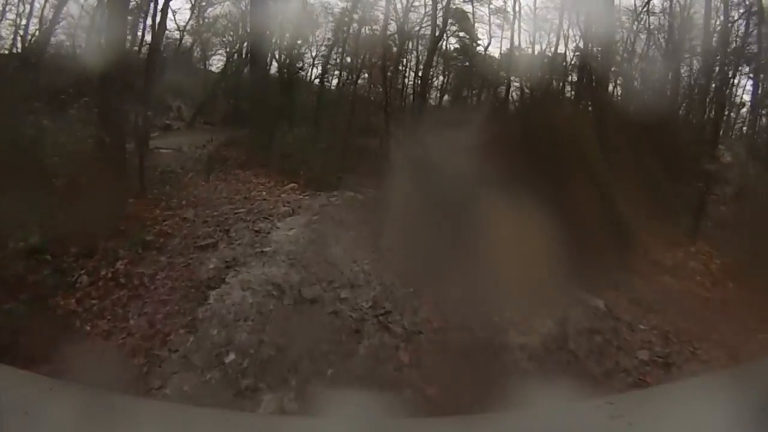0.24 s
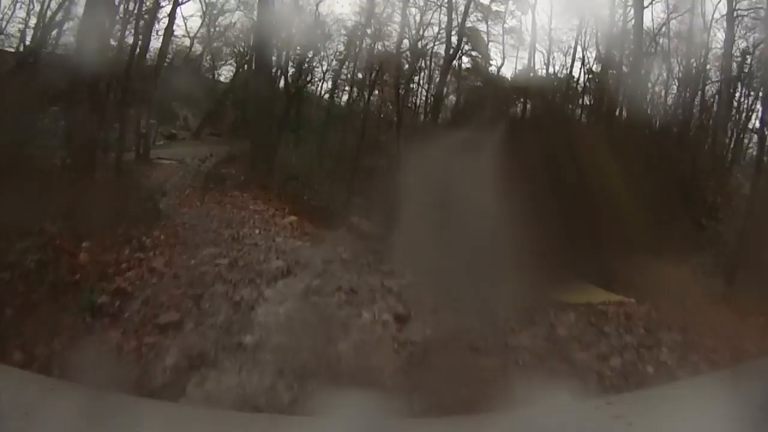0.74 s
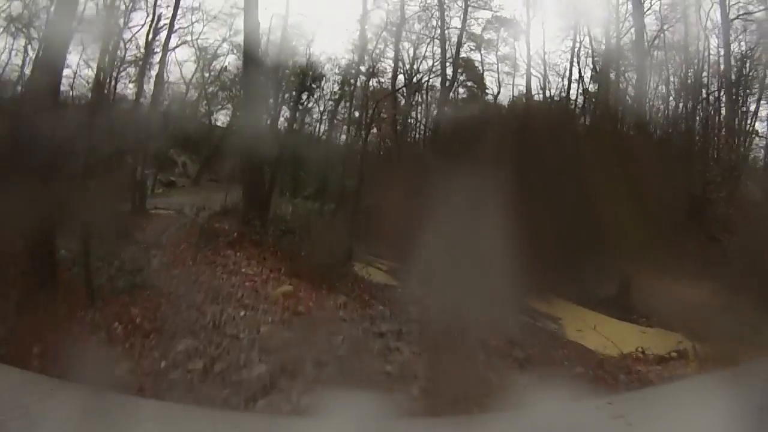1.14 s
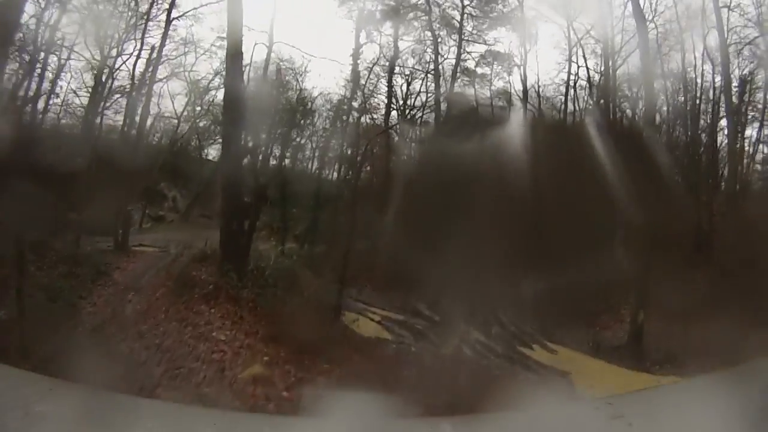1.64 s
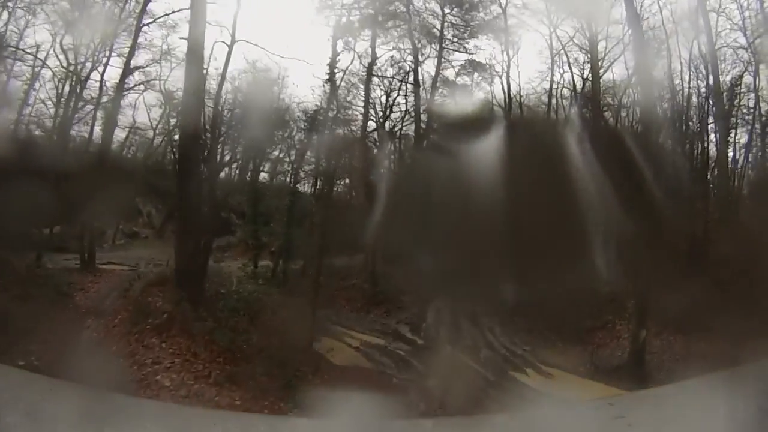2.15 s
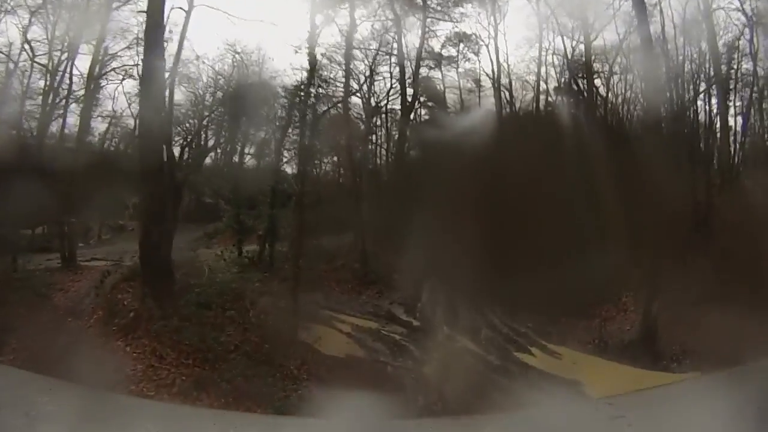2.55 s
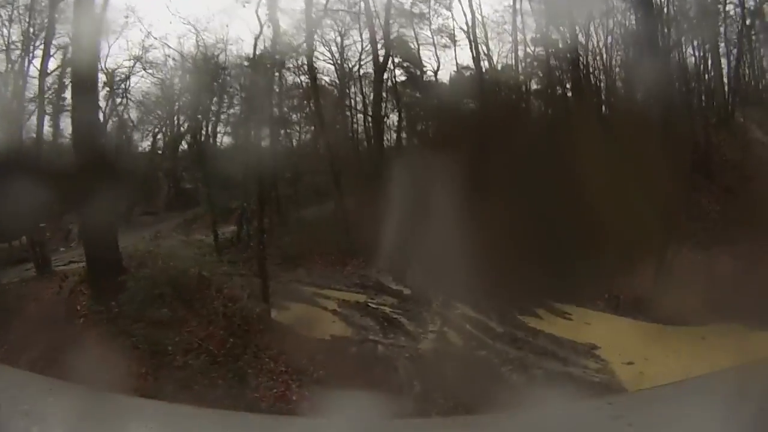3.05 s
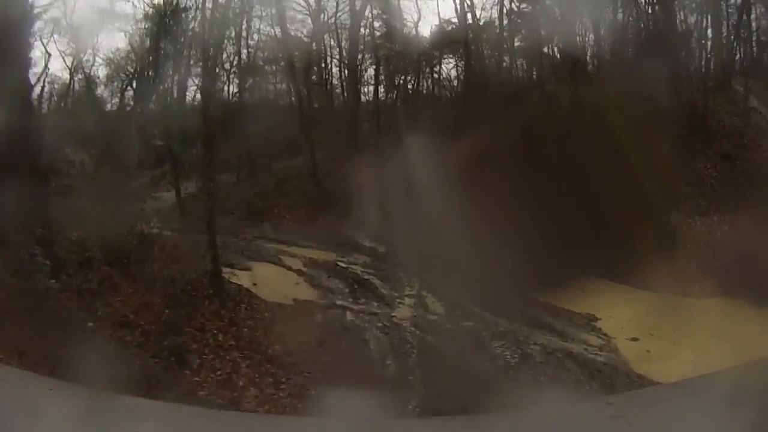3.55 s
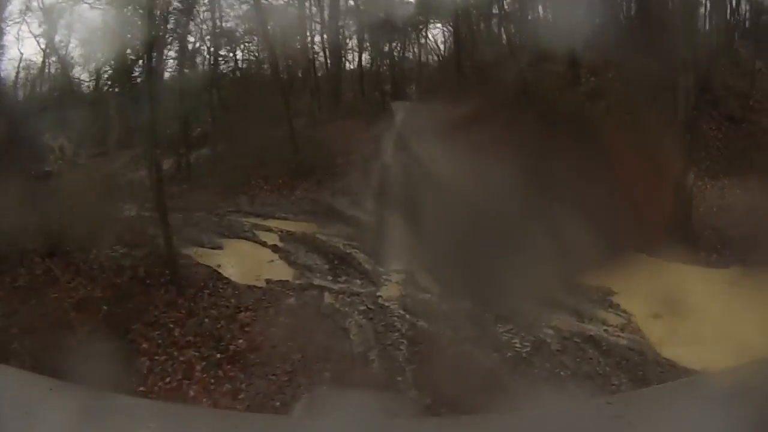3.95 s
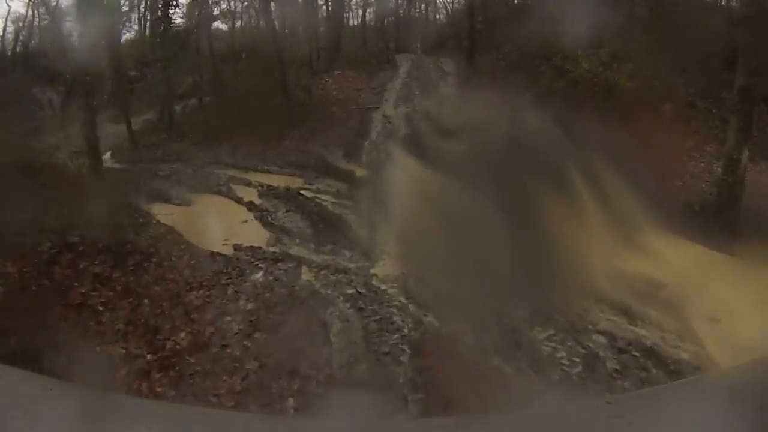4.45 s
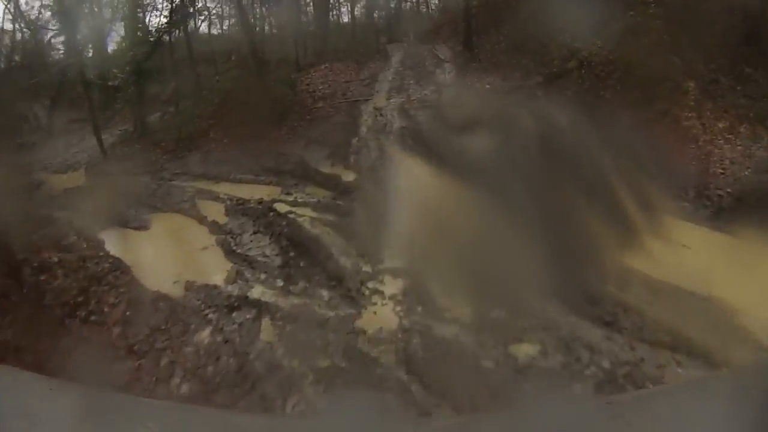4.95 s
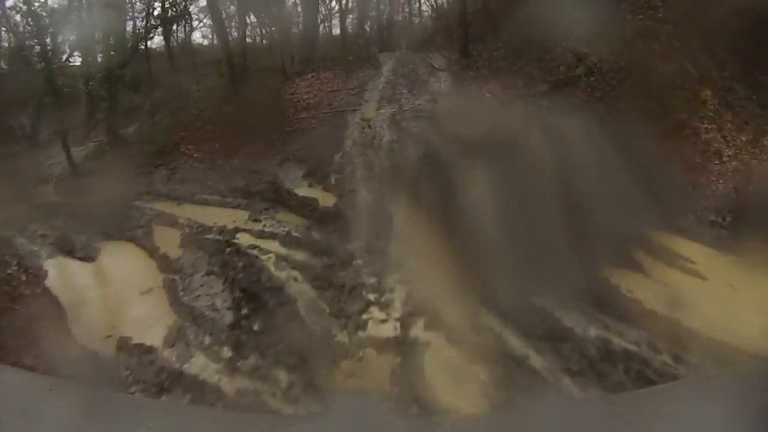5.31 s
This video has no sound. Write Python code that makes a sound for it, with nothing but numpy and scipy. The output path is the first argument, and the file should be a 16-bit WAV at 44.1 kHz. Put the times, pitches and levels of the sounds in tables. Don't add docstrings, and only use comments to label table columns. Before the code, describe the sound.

Heard inside the cabin of a diesel 4x4 in a rainy wood, mono and close. The engine begins as a low, subdued throb, picks up by 0.6 s and booms deeply from about 0.9 to 2.4 s, with a wavering growl above. It then drops to a slow, quiet chug until around 4 s, when deep shaking and soft suspension thumps come through, thickest from 3.2 to 4.2 s. From 4.4 s the revs climb steadily and the boom returns, still rising at the cut at about 5.6 s. Steady rain patters densely on the roof, thinning slightly after 3 s. Irregular drips tap and ring the panels, with strong knocks near 1.0, 1.35, 2.6, 2.9, 3.4 and 4.8 s. Dry, bright snaps hit the glass, notably at 1.35 and loudest at 2.4 s. A faint turbo hiss and floor drone lie beneath.

```python
import sys
import numpy as np
from scipy import signal
from scipy.fft import rfft, irfft, next_fast_len
from scipy.io import wavfile

SR = 44100
rng = np.random.default_rng(int(sys.argv[2]) if len(sys.argv) > 2 else 0)


def output_pcm(signal):
    pcm = np.clip(np.atleast_2d(signal).T, -1, 1) * 32767
    wavfile.write(sys.argv[1], SR, np.round(pcm).astype(np.int16))


def convert_level_to_amplitude(level_db):
    exponent = np.asarray(level_db, float) / 20
    return 10 ** exponent


N = 246071


def evened(x):
    return x / np.sqrt(np.mean(x ** 2) + 1e-20)


def resonances(modes, hz):
    power = sum(convert_level_to_amplitude(db) ** 2 / (1 + (2 * (hz - f) / width) ** 2) ** 2 for f, width, db in modes)
    return np.sqrt(power)


def noise(gain, size, lo_hz=0, hi_hz=SR):
    full = next_fast_len(size, True)
    hz = np.fft.rfftfreq(full, 1 / SR)
    spectrum = rfft(rng.standard_normal(full)) * gain(hz)
    inside = (hz >= lo_hz) * (hz < hi_hz)
    return evened(irfft(spectrum * inside, full)[:size])


def steady_noise(gain, lo_hz=0):
    return noise(gain, N + 1, lo_hz)[:N]


def drift(rate_hz):
    return steady_noise(lambda hz: 1 / (1 + (hz / rate_hz) ** 4))


def blow(rise, t60, size):
    t = np.arange(size) / SR
    attack = 1 - np.exp(-t / max(rise, 1e-5))
    shape = attack * convert_level_to_amplitude(-60 * t / max(t60, .003))
    return shape / shape.max()


def add(mix, s, sound):
    part = mix[round(s * SR):][:len(sound)]
    part += sound[:len(part)]


# time in seconds, firing rate in Hz, boom level in dB.
ENGINE_RUN = [(0.0, 31.0, -35), (0.31, 32.2, -31), (0.6, 33.3, -21), (0.78, 34.9, -28), (0.93, 36.3, -16.5),
              (1.47, 37.3, -18.5), (1.68, 37.4, -15), (2.1, 36.3, -15), (2.36, 34.4, -18), (2.5, 32.0, -33),
              (2.75, 29.0, -37), (3.62, 28.0, -34), (4.04, 29.8, -31), (4.44, 34.8, -28), (4.64, 37.3, -20),
              (4.89, 40.3, -16.5), (4.99, 41.5, -27), (5.58, 46.9, -21)]
ORDER_MULTIPLES = [2, 3, 5, 1.5, 2.5, 4, 6, 7]
ORDER_LEVELS = [-35.5, -46.5, -47, -42.5, -48, -51.5, -58, -55.5]
# frequency in Hz, width in Hz, lift in dB.
BODY_LIFT = [
    (86, 10, 10),
    (132, 30, 6),
]
# frequency in Hz, level in dB per Hz.
SHAKE_COLOUR = [(15, -23), (30, -2.5), (38, 8.5), (46, -2.5), (60, -5.5), (90, -15), (105, -17), (150, -17),
                (180, -13.5), (203, -12), (235, -17.5), (300, -23.5), (420, -25), (600, -57)]
# time in seconds, level in dB.
RUT_RUMBLE = [
    (0, -54),
    (.5, -30),
    (1, -45),
    (2.3, -41.5),
    (2.7, -36.5),
    (3.6, -27),
    (4.3, -34.5),
    (4.85, -36),
    (5.2, -28.5),
]
# peak time in seconds, pitch in Hz, level in dB, length in seconds.
SUSPENSION_JOLTS = [(0.706, 135, -34.5, 0.036), (1.964, 51.6, -25, 0.11), (2.31, 143, -31.5, .1),
                    (2.895, 37.3, -30, 0.46), (3.046, 39.7, -40, 0.18), (3.259, 45, -23, 0.045),
                    (3.344, 46.7, -22, 0.049), (3.525, 37.3, -25.5, 0.34), (3.718, 38, -23, 0.096),
                    (3.852, 44, -20.5, 0.14), (4.009, 41.5, -24, 0.25), (4.19, 40, -27, 0.23),
                    (5.27, 128, -37, 0.11), (5.383, 38.8, -30, 0.57)]


def engine():
    t = np.arange(N) / SR
    s, *columns = np.transpose(ENGINE_RUN)
    firing_hz, boom_db = (np.interp(t, s, column) for column in columns)
    turns = np.cumsum(firing_hz * (1 + .003 * drift(rate_hz=6))) / SR
    boom_db = boom_db - 4.6 * np.maximum(31.5 - firing_hz, 0)

    third_hz = 3 * firing_hz
    lifted_db = sum(lift_db / (1 + (2 * (third_hz - f) / width) ** 2) for f, width, lift_db in BODY_LIFT)
    orders = [(1, boom_db, .4)]  # multiple, level in dB, waver in dB
    for multiple, db in zip(ORDER_MULTIPLES, ORDER_LEVELS):
        orders.append((multiple, db + (multiple == 3) * lifted_db, 2.8))
    tones = np.zeros(N)
    for multiple, db, waver_db in orders:
        tone = np.sqrt(2) * np.cos(2 * np.pi * (multiple * turns + rng.random()))
        tones += convert_level_to_amplitude(db + waver_db * drift(rate_hz=7.4)) * tone

    f, db = np.transpose(SHAKE_COLOUR)
    shake = steady_noise(lambda x: convert_level_to_amplitude(np.interp(np.log(x + 1), np.log(f), db, left=-60, right=-90)))
    low_pass = signal.butter(2, 110, fs=SR, output="sos")
    rumble = signal.sosfiltfilt(low_pass, shake)
    rumble_db = np.interp(t, *np.transpose(RUT_RUMBLE)) + 3.2 * drift(rate_hz=5.9)
    rattle_db = -32.5 + 1.2 * drift(rate_hz=7.3)
    body = convert_level_to_amplitude(rumble_db) * rumble + convert_level_to_amplitude(rattle_db) * (shake - rumble)

    jolts = np.zeros(N)
    for s, hz, db, length in SUSPENSION_JOLTS:
        swell = np.exp(-(2 * (t - s) / length) ** 2)
        jolts += convert_level_to_amplitude(db) * swell * np.sin(2 * np.pi * hz * (t - s))
    return tones + jolts + body, turns


def turbo():
    s, hz = np.transpose(ENGINE_RUN)[:2]
    speed = np.interp(np.arange(N) / SR, s, hz) / 36
    hiss = steady_noise(lambda f: resonances([(3900, 3500, -1.5), (5600, 1600, -4.5)], f))
    drone = steady_noise(lambda f: resonances([(203, 14, 0), (522, 14, -6), (1100, 14, -13)], f))
    return convert_level_to_amplitude(-64.5) * speed ** 3.6 * hiss + convert_level_to_amplitude(-44) * drone


# frequency in Hz, width in Hz, level in dB.
CABIN_MODES = [(182, 137, 8), (529, 79, 5.5), (577, 29, 5.5), (626, 200, 5), (675, 13, -7), (800, 310, 0),
               (1040, 350, -4.5), (1106, 36, -3), (1560, 247, 3), (1720, 80, 5.5), (2220, 410, 2.5),
               (2800, 400, -5.5), (3090, 175, -7), (3420, 120, -36), (4250, 280, -17), (4670, 550, -15.5),
               (5500, 500, -17.5), (6730, 1600, -54), (11600, 14000, -37)]
# low edge in Hz, high edge in Hz, rise in seconds, factor on the ring time.
PANEL_BANDS = [
    (120, 350, 0.029, 1.42),
    (322, 1400, 0.00091, 1.77),
    (1180, 4200, 0.00077, 1.15),
    (3670, 5600, 0.00022, 0.55),
    (7000, 9000, .0003, 0.13),
]


def knock(levels_db, t60, size=8192, modes=CABIN_MODES):
    colour = resonances(modes, np.fft.rfftfreq(next_fast_len(size, True), 1 / SR))
    sound = np.zeros(size)
    for db, (lo_hz, hi_hz, rise, ring) in zip(levels_db, PANEL_BANDS):
        band = noise(lambda hz: colour, size, lo_hz, hi_hz)
        sound += convert_level_to_amplitude(db) * blow(rise, t60 * ring, size) * band
    return sound


# time in seconds, level in dB.
RAIN_LEVEL = [
    (0.0, -37),
    (0.8, -38),
    (2.051, -36.5),
    (3.26, -40.5),
    (3.64, -38.5),
    (4.26, -41),
    (4.94, -38),
    (5.58, -38),
]


def patter(turns):
    drops_per_s, patches = 320, 24
    strength = convert_level_to_amplitude(4.26 * np.minimum(rng.exponential(1, N), 3))
    strength = strength * (rng.random(N) < drops_per_s / SR)
    patch = rng.integers(0, patches, N)
    drops = np.zeros(N)
    for k in range(patches):
        tap = knock([-7.5, -2.5, -1.5, -15.5, -31], 0.054, size=4096)
        drops += signal.oaconvolve(strength * (patch == k), tap)[:N]

    wash = steady_noise(lambda hz: resonances(CABIN_MODES[1:], hz))
    firing_pulse = 1 + .5 * np.exp(-(turns % 1) / 0.24)
    wash *= firing_pulse * convert_level_to_amplitude(1.7 * drift(rate_hz=36))
    s, db = np.transpose(RAIN_LEVEL)
    level = convert_level_to_amplitude(np.interp(np.arange(N) / SR, s, db))
    return level * evened(evened(drops) + 0.65 * evened(wash))


# time in seconds, middle level in dB, low-middle level in dB, middle mode of the panel in Hz.
HEAVY_DRIPS = [(0.632, -20, -24, 2100), (0.6764, -30, -39, 1600), (0.972, -14.5, -26, 1720),
               (1.1855, -29.5, -36.5, 2330), (1.2424, -26, -36, 1740), (1.353, -13.5, -19.5, 2380),
               (1.425, -28.5, -38, 2200), (2.4104, -24, -37.5, 2170), (2.577, -19, -26.5, 2390),
               (2.5894, -26, -29.5, 1750), (2.9287, -30, -38, 2410), (2.9354, -14.5, -24, 2165),
               (3.2063, -30, -41, 1710), (3.3975, -17.5, -23, 2270), (3.4143, -15, -21.5, 2220),
               (3.6694, -22, -28.5, 1680), (3.6854, -30, -49, 2170), (3.9836, -28, -40, 2300),
               (4.2448, -23.5, -24, 2220), (4.4026, -31, -51, 2300), (4.4215, -34, -39, 2350),
               (4.8184, -32, -36, 1550), (4.8407, -18, -20, 2350), (5.4819, -27.5, -37, 1630)]
# time in seconds, level in dB.
LIGHT_DRIPS = [(0.1113, -27), (0.2426, -33), (0.2906, -29.5), (0.3714, -26.5), (0.4675, -28.5), (1.04, -26),
               (1.0809, -32), (1.3034, -36), (1.6272, -37), (1.8255, -31), (1.9694, -33), (2.2401, -31),
               (2.298, -30), (2.659, -30), (2.6909, -25), (3.0171, -31), (3.0947, -26.5), (3.1373, -28),
               (3.5456, -23.5), (3.7092, -33), (3.8855, -27.5), (3.897, -25.5), (3.9161, -31),
               (4.0325, -27.5), (4.2108, -30), (4.6485, -29.5), (4.9898, -34), (5.0246, -27)]


def drips():
    out = np.zeros(N)
    for s, mid_db, low_db, mid_hz in HEAVY_DRIPS:
        upper_db = -36.5 + 1.38 * (mid_db + 19.5)
        low_hz = 740 + 9.5 * (low_db + 30)
        levels_db = [low_db - 7.0, low_db, mid_db - 5.0, upper_db + 2.0, upper_db - 33]
        panel = [(low_hz, 200, 5), (930, 250, -2), (mid_hz, 300, 3),
                 (2900, 500, -3), (150, 60, -4), (280, 80, -6)]
        add(out, s, knock(levels_db, 0.074, modes=CABIN_MODES + panel))
    for s, db in LIGHT_DRIPS:
        add(out, s, knock([db - 22, db - 13, db - 9.0, db - 20.5, db - 41], 0.038, size=4096))
    return out


# time in seconds, low level in dB, low mode in Hz, bright level in dB, high mode in Hz.
GLASS_SNAPS = [(0.136, -55, 1710, -40, 4900), (0.5409, -39, 2170, -35, 5200), (1.3514, -14, 3280, -9, 5530),
               (2.1007, -23, 1680, -49, 4240), (2.384, -8, 2050, -4.5, 5780),
               (2.862, -17, 2060, -16.5, 5780), (3.4553, -38, 2130, -33.5, 5600),
               (3.4607, -25, 1560, -36.5, 7060), (3.4665, -30, 2230, -46, 4620),
               (3.5304, -15, 2440, -19.5, 5520), (3.587, -36, 2100, -42, 5430),
               (3.8579, -18, 1540, -19, 4950), (4.5984, -31, 2080, -32, 5220),
               (5.3322, -21.5, 2540, -34, 7300)]
# time in seconds, level in dB, bright level in dB, spark level in dB.
KNOCK_CRACKS = [(0.6337, -14.5, -42, -50), (0.9731, -20, -26, -47), (1.356, -11, -16, -32),
                (2.4108, -28, -37, -48), (2.5742, -19, -18, -35), (2.9361, -7, -39, -56),
                (3.3983, -12, -41, -45), (3.4141, -10, -26, -41), (3.6687, -36, -23.5, -46),
                (4.2467, -19.5, -38, -53), (4.84, -14.5, -38, -56), (5.4829, -26.5, -46, -62)]
# factor on the low or high mode, level in dB, fall by 60 dB in seconds.
SNAP_MODES = [
    (1., 0, .016),
    (1.3, -5, .011),
    (.78, -6, .011),
    (1.17, -6, .011),
]


def snaps():
    size = 2048
    out, t = np.zeros(N), np.arange(size) / SR
    hits = []
    for s, db, low_hz, bright_db, high_hz in GLASS_SNAPS:
        spark_db = -39.5 + 0.78 * (bright_db + 20)
        hits.append((s, db, low_hz, bright_db, high_hz, spark_db))
    for s, db, bright_db, spark_db in KNOCK_CRACKS:
        nearest = min(HEAVY_DRIPS, key=lambda row: abs(row[0] - s))
        hits.append((s, db, nearest[-1], bright_db, 4430, spark_db))

    spark_modes = [(7300, 2900, -7.0), (9340, 2800, 3.0), (12500, 2200, 2.5)]
    for s, db, low_hz, bright_db, high_hz, spark_db in hits:
        # centre in Hz, level in dB, factor on ring time
        for hz, level_db, quick in [(low_hz, db - 6.0, 1.1), (high_hz, bright_db - 11.0, .8)]:
            for factor, mode_db, t60 in SNAP_MODES:
                ring = np.sin(2 * np.pi * (hz * factor * t + rng.random()))
                add(out, s, convert_level_to_amplitude(level_db + mode_db) * blow(.0004, quick * t60, size) * ring)
            crack = noise(lambda f: resonances([(1.034 * hz, 0.59 * hz, 0)], f), size, 1200)
            add(out, s, convert_level_to_amplitude(level_db) * blow(0.00025, 0.01, size) * crack)
        spark = noise(lambda f: resonances(spark_modes, f), size, 5000)
        add(out, s, convert_level_to_amplitude(spark_db + 2.0) * blow(0.00012, 0.0057, size) * spark)
    return out


def scene():
    motor, turns = engine()
    return (motor + turbo() + patter(turns) + drips() + snaps())[None]


def top_cut(x):
    return signal.sosfilt(signal.butter(12, 14730, fs=SR, output="sos"), x)


def record(dry):
    hiss = steady_noise(lambda hz: 1 / np.sqrt(1 + (hz / 12500) ** 16), 6000)
    edge = steady_noise(lambda hz: 1 / np.sqrt(1 + (hz / 14300) ** 30), 12500)
    flicker = np.clip(.6 + 1.2 * drift(rate_hz=25), 0, 1)
    mix = dry + convert_level_to_amplitude(-72) * (hiss + .5 * flicker * edge)
    return top_cut(mix)


dry = scene()
out = record(dry)
output_pcm(out)
```